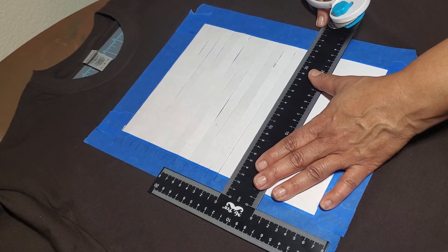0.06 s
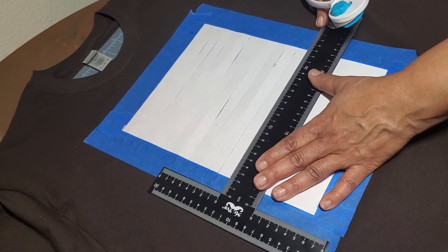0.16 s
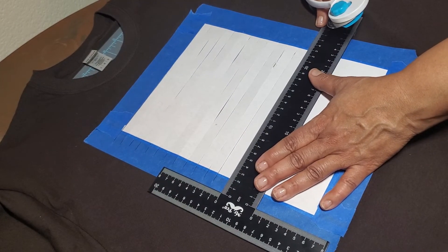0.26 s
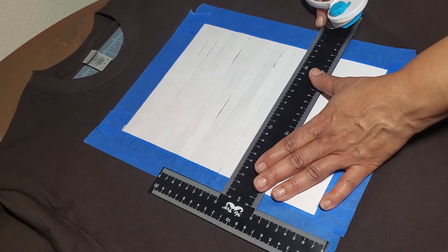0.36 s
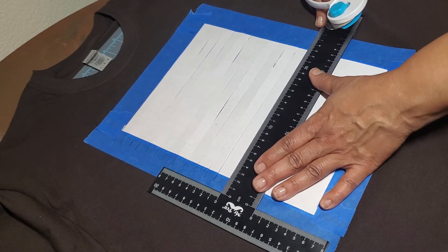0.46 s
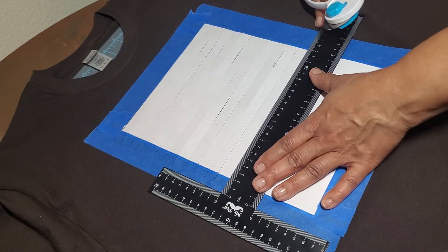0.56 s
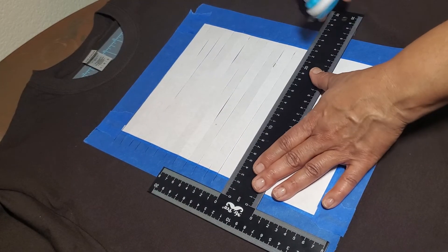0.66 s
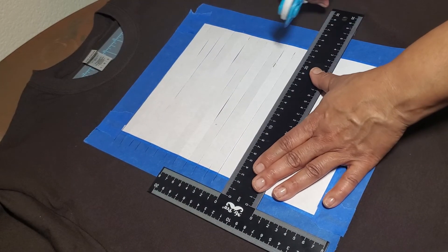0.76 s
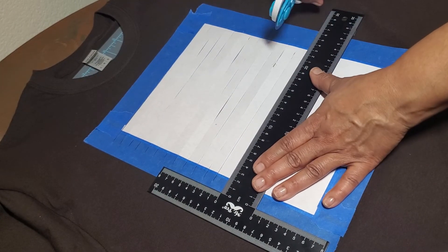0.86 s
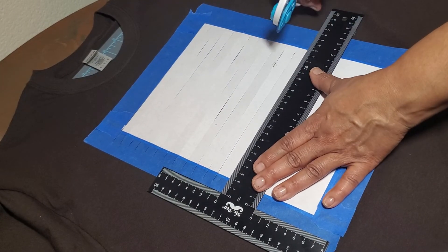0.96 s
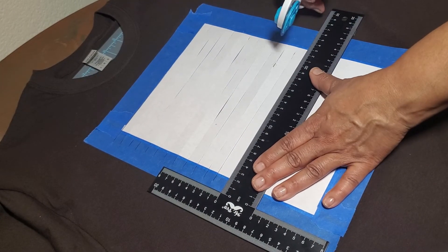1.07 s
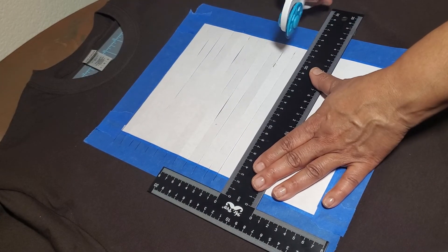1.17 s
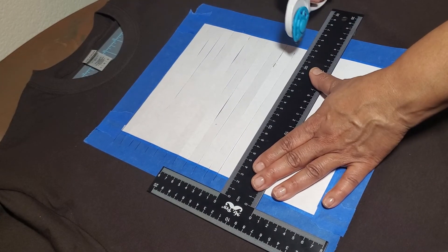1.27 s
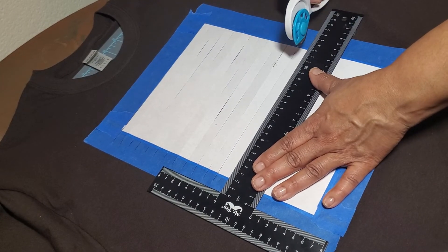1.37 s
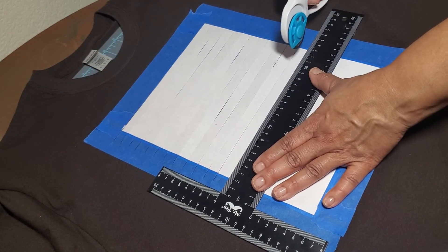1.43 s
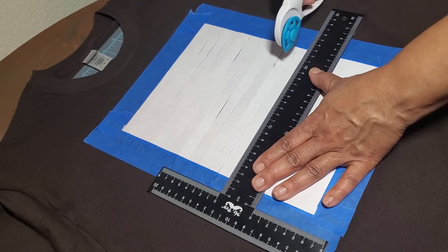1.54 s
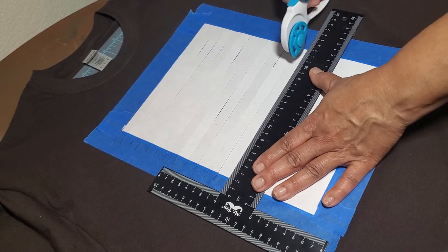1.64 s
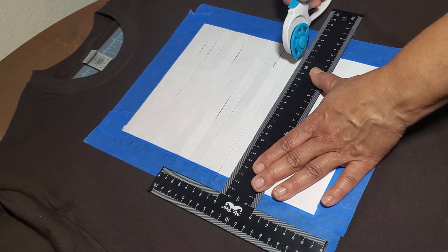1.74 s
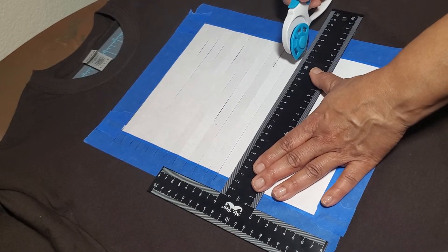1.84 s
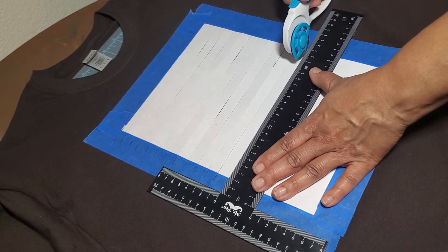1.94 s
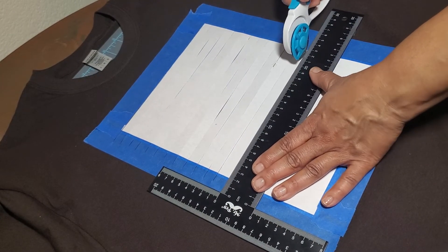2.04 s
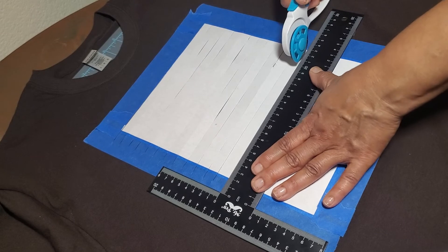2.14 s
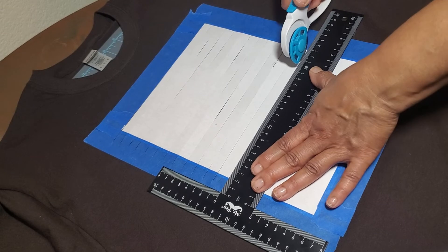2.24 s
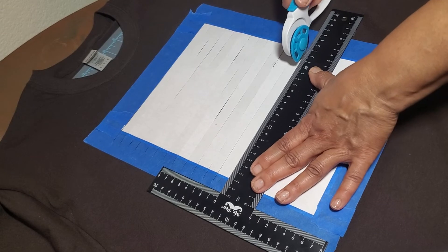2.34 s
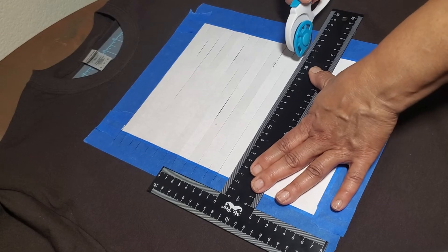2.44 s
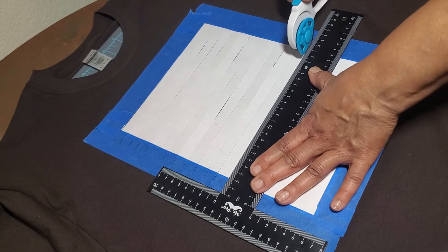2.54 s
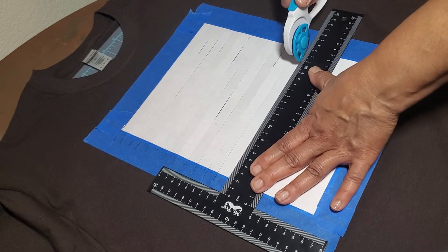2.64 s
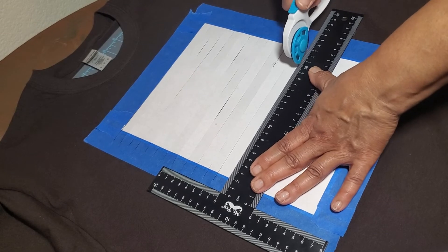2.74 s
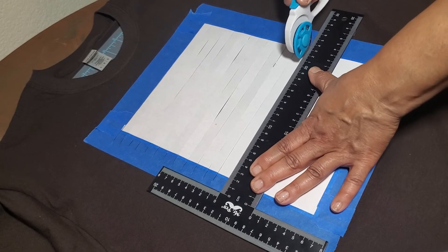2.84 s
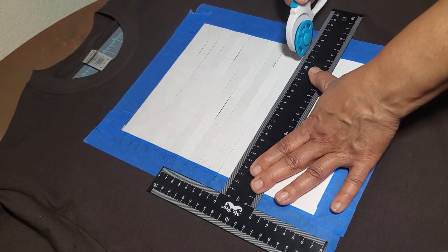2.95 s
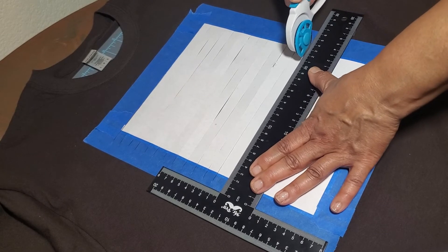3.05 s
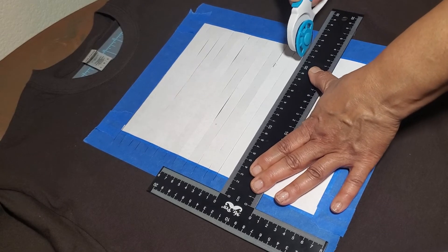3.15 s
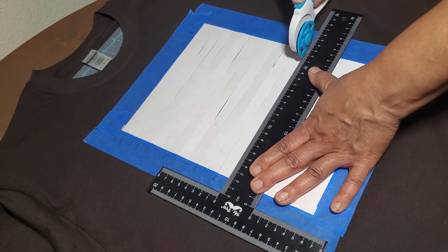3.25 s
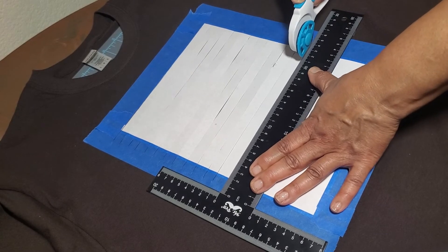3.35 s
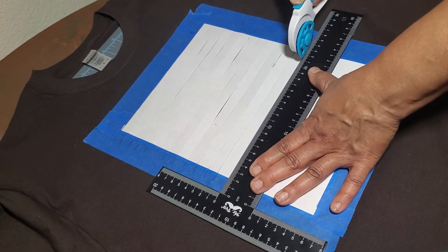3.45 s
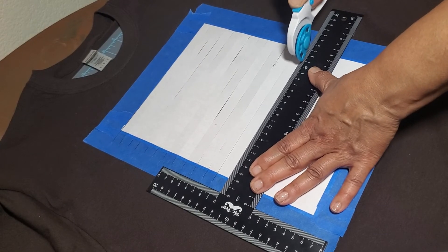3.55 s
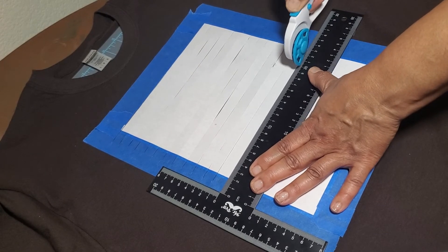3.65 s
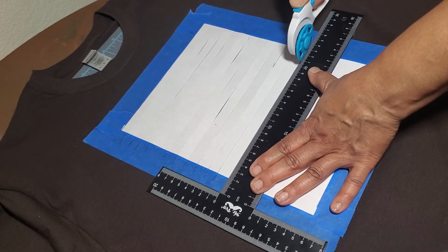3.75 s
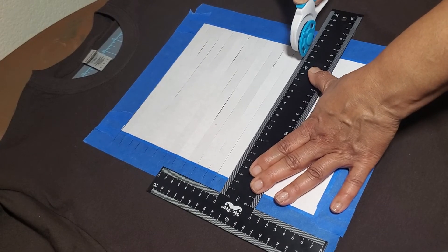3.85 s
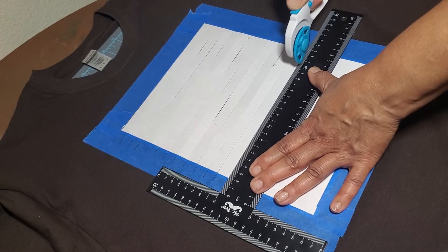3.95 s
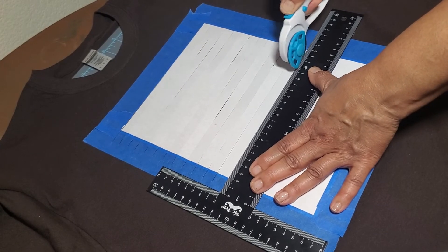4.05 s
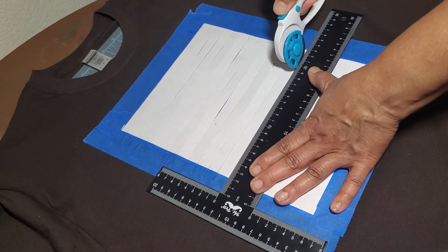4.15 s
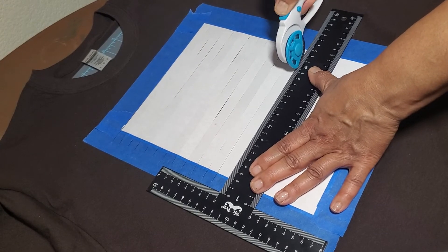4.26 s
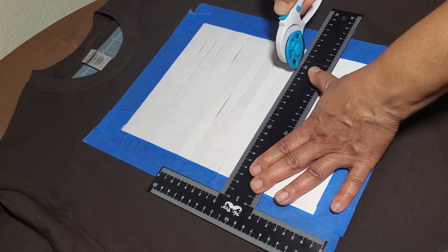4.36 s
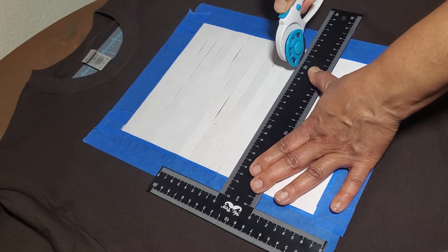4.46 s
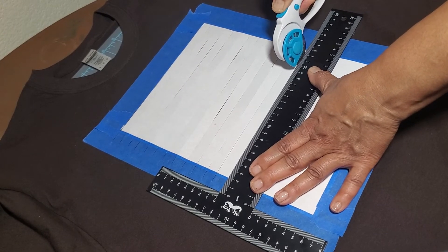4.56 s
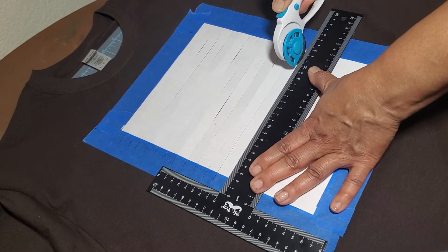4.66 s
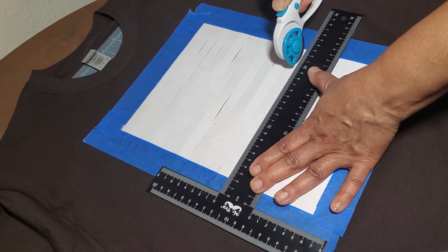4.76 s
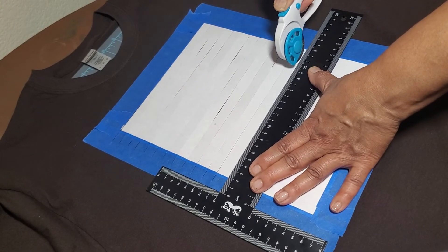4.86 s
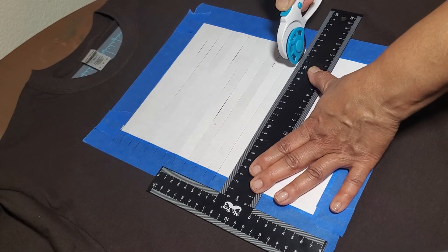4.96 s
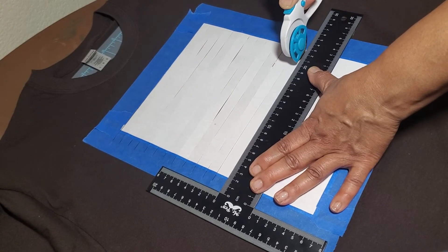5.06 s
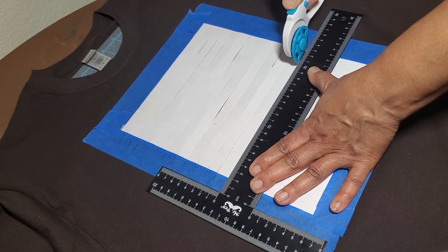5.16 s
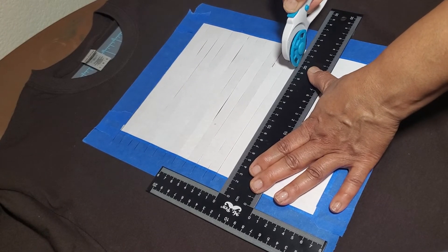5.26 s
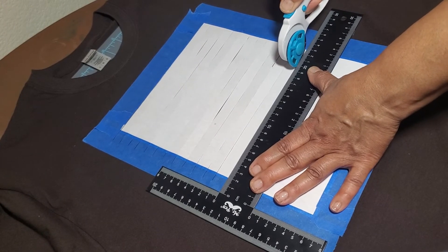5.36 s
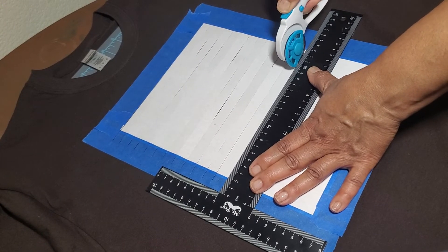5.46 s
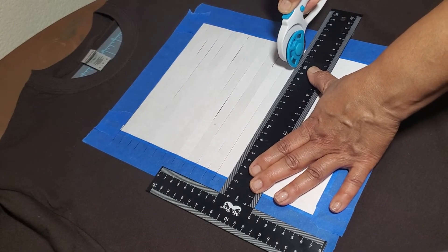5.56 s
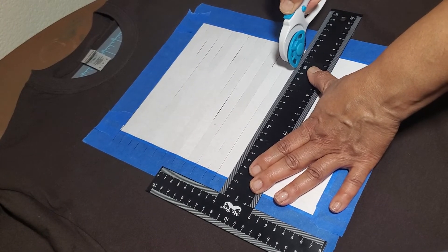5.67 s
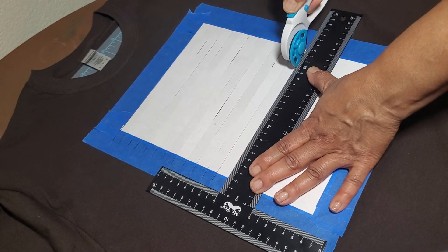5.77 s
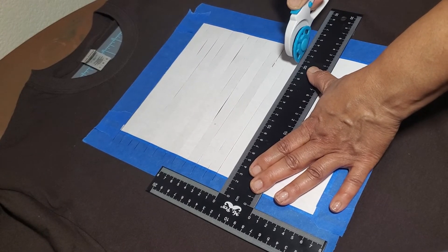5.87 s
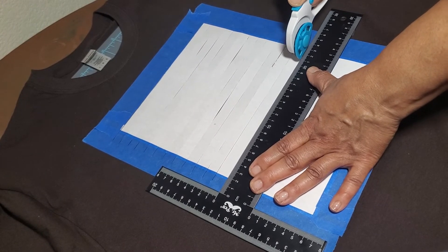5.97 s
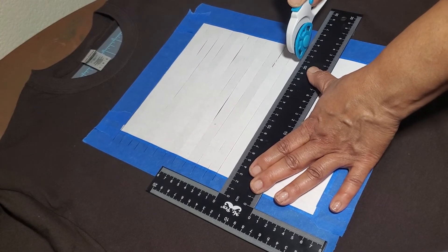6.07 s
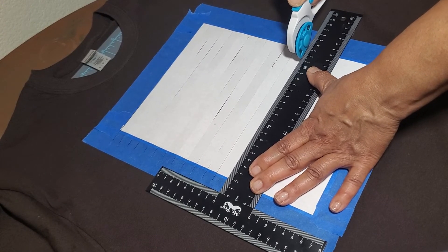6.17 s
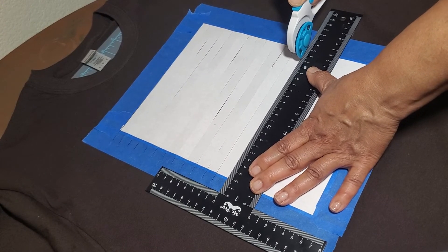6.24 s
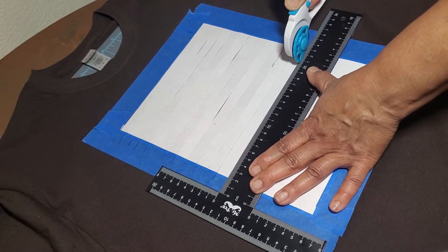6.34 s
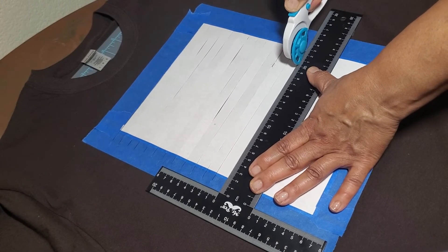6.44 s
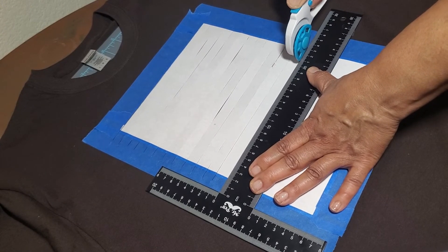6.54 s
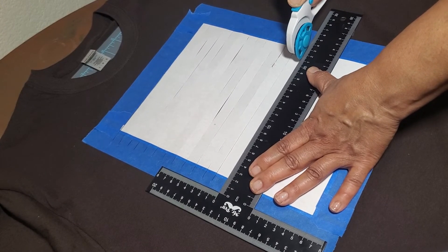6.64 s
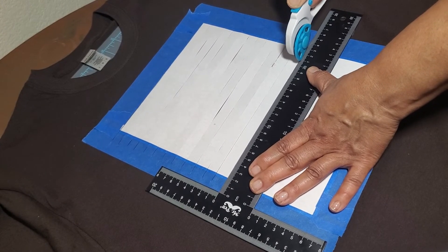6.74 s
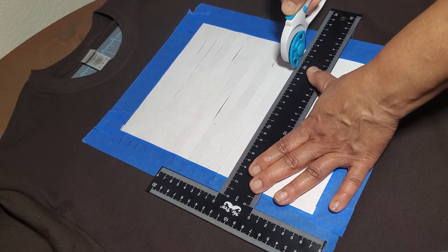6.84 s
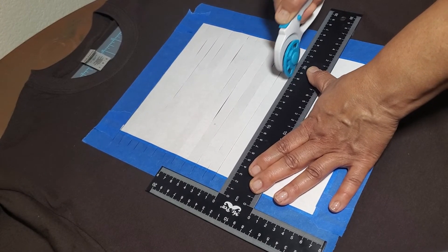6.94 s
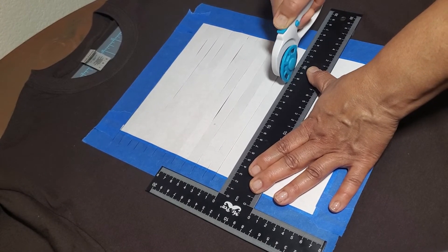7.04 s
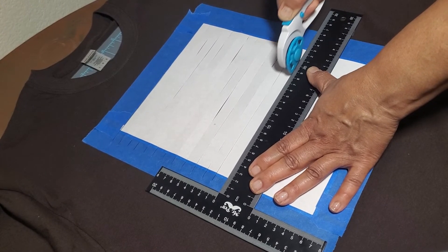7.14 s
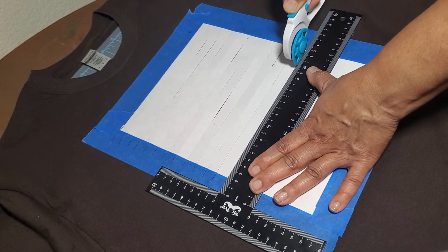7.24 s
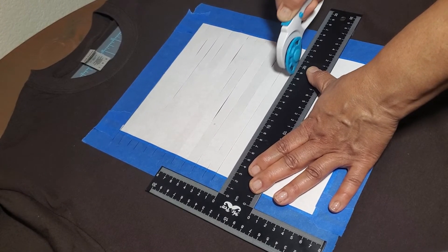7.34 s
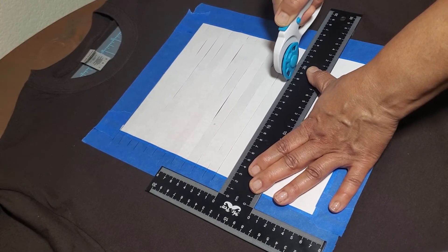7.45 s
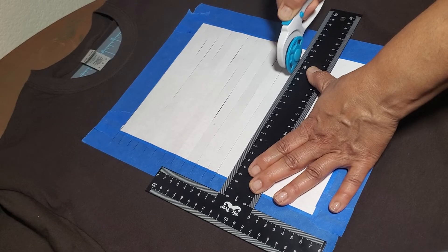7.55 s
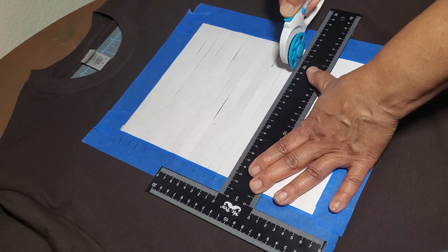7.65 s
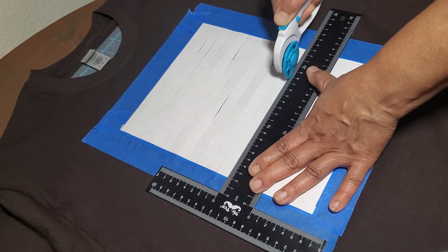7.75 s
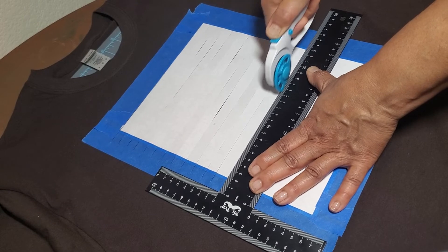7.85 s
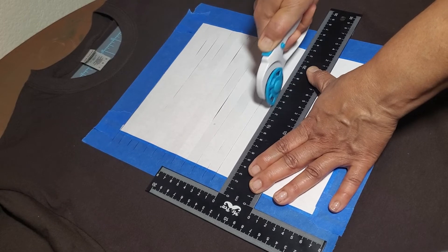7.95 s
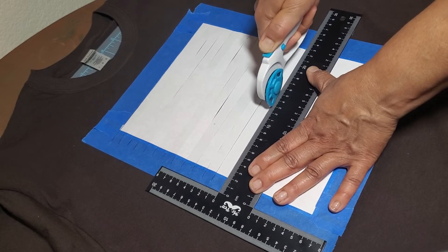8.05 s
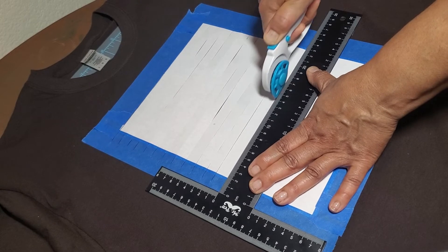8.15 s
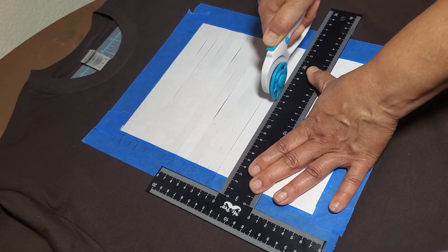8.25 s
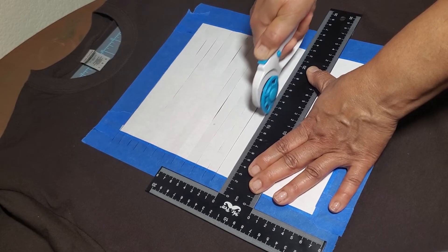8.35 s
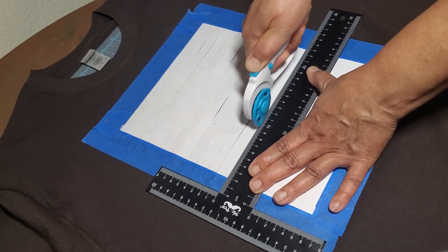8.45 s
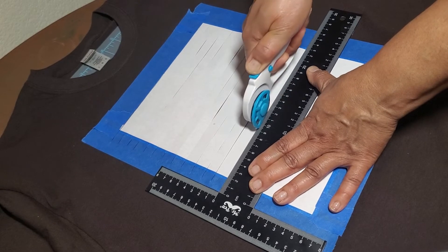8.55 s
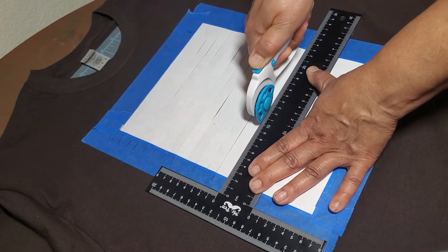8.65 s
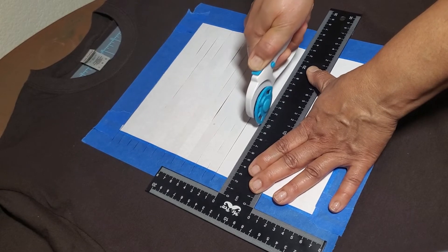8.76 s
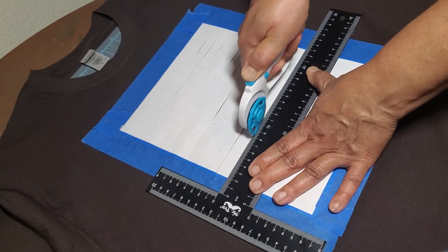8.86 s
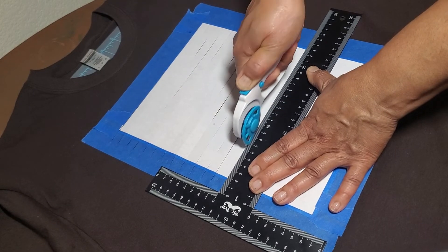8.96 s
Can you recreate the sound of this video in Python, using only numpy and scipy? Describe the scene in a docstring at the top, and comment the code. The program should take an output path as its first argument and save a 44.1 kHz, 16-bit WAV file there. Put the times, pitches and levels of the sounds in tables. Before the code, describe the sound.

A quiet indoor worktable over a low drone. For several seconds there are only hollow little knocks, a few handle clicks and padded bumps. Then a brief dry paper cut is heard, followed by another that swells, and three brighter crunchy slices close together, mixed with loud plastic clicks and knocking. The microphone is near, with a short room response.

```python
"""A rotary cutter is pushed through paper in five short strokes: random snaps make the fibres rasp.
Before and between the strokes something loose knocks dully, alone or in quick runs of hollow ringing modes.
The plastic handle clicks with short noisy cracks, bumps ring the cloth-covered table, and bands of noise
make light brushes. A small room of fading noise answers, over a low machine hum, rumble and faint hiss."""
import sys
import numpy as np
from scipy import signal
from scipy.fft import rfft, irfft, next_fast_len
from scipy.io import wavfile
from scipy.ndimage import uniform_filter1d

SR = 44100
rng = np.random.default_rng(int(sys.argv[2]) if len(sys.argv) > 2 else 0)


def wav_out(sig):
    """Save sig, one row per channel (or a flat mono array), as 16-bit PCM at SR to the path in sys.argv[1]."""
    wavfile.write(sys.argv[1], SR, np.round(np.clip(np.atleast_2d(sig).T, -1, 1) * 32767).astype(np.int16))


N = 397076
TIME = np.arange(N) / SR  # s
RING = TIME[:SR // 2]  # s, the time axis of every hit and room response


def undb(db):
    """Turn decibels into a gain."""
    return 10 ** (np.asarray(db) / 20)


def unit(x):
    """Scale a sound to rms 1."""
    return x / np.sqrt(np.mean(x ** 2))


def unit_energy(x):
    """Scale a response so that it passes noise at the same power."""
    return x / np.sqrt(np.mean(np.sum(x ** 2, axis=-1)))


def shape(x, gain):
    """Filter by a gain that is a function of frequency."""
    size = 2 * next_fast_len(x.shape[-1])
    f = np.linspace(1, SR / 2, size // 2 + 1)
    return irfft(rfft(x, size) * gain(f))[..., :x.shape[-1]]


def colour(x, points):
    """Filter through (f/Hz, level/dB) points, with no sound ahead of its cause."""
    hz, db = np.transpose(points)

    def gain(f):
        """Folding the cepstrum forward in time gives the minimum-phase filter."""
        level_db = np.interp(np.log(f), np.log(hz), db)
        cepstrum = irfft(np.log(undb(level_db)))
        cepstrum[1:len(f) - 1] *= 2
        cepstrum[len(f):] = 0
        return np.exp(rfft(cepstrum))
    return shape(x, gain)


def bell(f, hz, octaves):
    """A hump on the log-frequency axis."""
    return np.exp(-.5 * (np.log2(f / hz) / octaves) ** 2)


def walk(rate):
    """Smooth random wandering with rms 1; rate is the number of fresh values a second."""
    k = int(SR / rate)
    steps = np.repeat(rng.standard_normal(N // k + 1), k)
    smooth = uniform_filter1d(uniform_filter1d(steps, k), k)
    return unit(smooth[:N])


def diffuse(size):
    """Noise from all around: the bass is alike in both channels, the treble unrelated."""
    alike_hz = 684
    mid, side = rng.standard_normal((2, size))
    alike = lambda f: 1 / (1 + (f / alike_hz) ** 1.26)
    mid = shape(mid, lambda f: np.sqrt(1 + alike(f)))
    side = shape(side, lambda f: np.sqrt(1 - alike(f)))
    return unit(np.array([mid + side, mid - side]))


def fade(t60):
    """Exponential decay that falls by 60 dB in t60 seconds."""
    return np.exp(-np.log(1000) * RING / t60)


def ring(modes):
    """Stereo sum of fading (f/Hz, level/dB, t60/s) tones; higher ones differ more in phase between channels."""
    out = 0
    for hz, db, t60 in modes:
        phase = rng.random() + rng.standard_normal((2, 1)) * hz / 6000  # in turns
        out = out + undb(db) * fade(t60) * np.sin(2 * np.pi * (hz * RING + phase))
    return unit_energy(out)


def add(out, s, db, hit):
    """Place a hit at s seconds so that its loudest 3 ms reach the given level."""
    power = np.atleast_2d(hit).mean(axis=0) ** 2
    peak = np.sqrt(uniform_filter1d(power, size=132).max())
    i = int(s * SR)
    out[..., i:i + len(RING)] += (hit * undb(db) / peak)[..., :N - i]


def room(early_db, late_db, early_t60):
    """Direct sound, reflections off table and arms, then the walls, built up gradually from noise."""
    wall_t60 = 0.33  # s
    response = undb(early_db) * unit_energy(diffuse(len(RING)) * fade(early_t60))
    walls = diffuse(len(RING)) * fade(wall_t60) * (1 - fade(.06))
    response += undb(late_db) * unit_energy(walls)
    response[[0, 1], [4, 0]] += 1  # direct sound, four samples later on the left
    return unit_energy(response)


def through(x, response):
    """Pass a sound through a stereo response."""
    return signal.fftconvolve(np.atleast_2d(x), response, axes=1)[:, :x.shape[-1]]


def pan(db):
    """Gains that make the left channel this many dB louder than the right."""
    return undb(np.array([[db], [-db]]) / 2)


def hum():
    """A machine drones on two wavering tones a fifth apart, with a mains tone, rumble and hiss."""
    # lowest tone, before its random wavering: t/s, level/dB
    drone_curve = [(0.0, -55), (1.08, -57.5), (4.33, -53.5), (5.11, -64.5), (5.44, -47.5), (6.39, -48),
                   (6.64, -53), (8.5, -52), (8.67, -64), (9.0, -45)]
    # mains tone: t/s, level/dB
    mains_curve = [(1, -59), (1.8, -75.5), (9, -62)]
    # tone colour of the rumble: f/Hz, relative level/dB
    rumble_colour = [(20, -24), (35, -8.5), (55, -1), (72, -1.5), (83, 2), (95, -5), (108, -7),
                     (140, -10.5), (175, -21), (300, -20.5), (420, -36), (1500, -45), (4000, -55.5)]
    # tone colour of the hiss: f/Hz, relative level/dB
    hiss_colour = [(300, 0), (1000, 9), (2500, 7), (5000, 5), (5600, 13), (6800, 11.5), (7300, -25),
                   (9000, -9.5), (12000, 7.5), (16000, -27)]
    drone_hz, mains_hz = 63.7, 120.3
    drone_db, mains_db = (np.interp(TIME, *np.transpose(curve)) for curve in (drone_curve, mains_curve))
    wavering_hz = drone_hz * (1 + 0.01215 * walk(6))
    phase = 2 * np.pi * np.cumsum(wavering_hz) / SR
    drone = undb(drone_db + 1.8 * walk(9)) * unit(np.sin(phase))
    drone += undb(-60 + 3.3 * walk(3.1)) * unit(np.sin(3 * phase / 2))  # the third order of the shaft
    mains = undb(mains_db) * unit(np.sin(2 * np.pi * mains_hz * TIME))
    rumble = undb(-55.0 + 0.9 * walk(4.7)) * unit(colour(diffuse(N), rumble_colour))
    hiss = undb(-81) * unit(colour(diffuse(N), hiss_colour))
    return (drone + mains + rumble + hiss) * pan(1.0)


def knock_contacts():
    """Every knock as (t/s, level/dB, brightness/dB): within a run they are evenly spaced and grow."""
    # single knocks and runs: t/s of the first, time to the last/s,
    # relative peak level of the first/dB, relative brightness/dB
    runs = [(.298, 0, -61, -32), (.985, .105, -59, -42), (2.189, .24, -55, -28), (2.542, .336, -42.5, -11),
            (2.995, 0, -50.5, -21.5), (3.138, .106, -48.5, -20), (3.543, 0, -52, -4.5), (3.725, 0, -50, -9),
            (3.794, .111, -48, -13), (4.04, .102, -49, -17), (4.376, .099, -52, -21), (5.226, 0, -54, -27),
            (5.756, 0, -48, -9), (5.995, 0, -52.5, -13), (6.151, 0, -53, -10), (6.327, 0, -50.5, -4.5),
            (6.472, .106, -42, -15), (6.706, 0, -44, -21), (7.068, .117, -42, -9.5), (7.31, .23, -48, -2),
            (7.718, 0, -50, -3), (8.091, 0, -44.5, -8.5), (8.196, 0, -51, -31), (8.577, .11, -47.5, -11)]
    usual_gap, growth_db = .11, 1.5  # s between knocks; each is a little harder than the one before
    for start, length, db, upper_db in runs:
        count = 1 + round(length / usual_gap)
        for k, s in enumerate(np.linspace(start, start + length, count)):
            yield s, db + k * growth_db, upper_db


def knocks():
    """Something loose knocks: each knock adds freshly drawn scattered noise to the same hollow ring."""
    # tones of the hollow ring: f/Hz, relative level/dB, t60/s
    hollow_modes = [(190, -6, 0.38), (316.2, -0.5, 0.39), (297.3, 5.5, 0.11), (372, -2.5, 0.3),
                    (431.5, -30, 0.23), (513, -11, 0.21), (798, -8, 0.52), (967, -24, 0.13),
                    (1230, -16, 0.17), (1430, -8, 0.52)]
    # tone colour of the scattered noise: f/Hz, relative level/dB
    scatter_colour = [(120, -16), (300, 3.5), (480, 4.5), (800, -0.5), (1450, -7), (1750, -26.5),
                      (4000, -30)]
    out = np.zeros((2, N))
    hollow = ring(hollow_modes)
    soft_contact = 1 - fade(.015)  # a gentle onset
    for s, db, upper_db in knock_contacts():
        scatter = diffuse(len(RING)) * fade(0.41)
        response = hollow + undb(-1.5) * unit_energy(colour(scatter, scatter_colour))
        bright_db = 0.86 * (upper_db + 8.0)
        tone = [(450, 0.0062), (1000, bright_db - 1.5), (1500, bright_db), (2500, bright_db + 0.5)]
        add(out, s, db, colour(response * soft_contact, tone))
    return undb(-2.0) * out


def brushes():
    """Skin and plastic slide lightly over paper and ruler: bands of noise that swell and fade."""
    # strokes of hand and cutter: t/s of the middle, length/s (spread of the bell-shaped swell),
    # level/dB before it flickers, centre f/Hz, width/octaves
    touches = [(1.544, .013, -63, 4330, 0.38), (2.696, 0.011, -59.5, 3900, 0.56),
               (2.782, .098, -67, 3400, 0.69), (3.352, 0.027, -79, 2700, 0.28),
               (4.113, 0.0097, -66.5, 5150, 0.21), (4.345, 0.029, -64.5, 3900, 0.72),
               (4.681, .01, -71, 2620, .55), (4.892, .018, -63, 2920, 0.55),
               (6.366, 0.029, -67, 3440, 0.88), (7.764, .017, -55, 5920, 0.76)]
    out = np.zeros(N)
    for s, length, db, hz, octaves in touches:
        grain = unit(shape(rng.standard_normal(N), lambda f: bell(f, hz, octaves)))
        out += undb(db) * grain * np.exp(-.5 * ((TIME - s) / length) ** 2)
    flicker = undb(2 * walk(90))
    return through(out * flicker, room(early_db=-2, late_db=-6, early_t60=.03)) * pan(3)


def clicks():
    """The blade shifts in its plastic handle: a brief noisy scrunch and a short ring."""
    # clicks of handle and blade: t/s, relative peak level/dB, relative top level/dB
    contacts = [(1.7479, -44, -27), (1.767, -45.5, -35), (2.129, -63, -9), (2.309, -54, -2.5),
                (4.789, -52.5, -26), (4.8399, -42, -15.5), (6.3258, -59, -8), (6.4999, -50.5, 2.5),
                (7.089, -34, -4.5), (7.1278, -41, -3), (7.1679, -37, -4.5), (7.196, -37.5, -6.5),
                (7.374, -46.5, -3.5), (7.41, -47, -2.5), (7.5577, -49, -13), (7.803, -36, -1),
                (7.907, -32, -5), (8.126, -55, -4), (8.1564, -52.5, -4.5), (8.2726, -53, -9),
                (8.9468, -33.5, -5)]
    # ringing of the handle: f/Hz before the random shift, relative level/dB, t60/s
    handle_modes = [(1370, -32, .12), (2234, 4, 0.12), (3150, -10.5, 0.16), (3470, -4.5, 0.13),
                    (4290, -5, 0.067), (5070, -1.5, 0.12), (7030, -2, 0.059)]
    out = np.zeros((2, N))
    space = room(early_db=-4, late_db=-4.5, early_t60=.06)
    for s, db, top_db in contacts:
        low_db = -17.5 - 0.68 * top_db  # a softer contact trades top for low body
        # the pitches vary slightly at random from click to click
        varied = [(hz * (1 + .012 * rng.standard_normal()), mode_db, t60) for hz, mode_db, t60 in handle_modes]
        handle = ring(varied)
        crack = unit_energy(diffuse(len(RING)) * np.exp(-(RING / .0075) ** 2))
        crack += undb(-11.5) * handle
        tone = [(200, low_db - 7.0), (900, low_db + 12.5), (2200, low_db + 0.5), (3300, 0.087),
                (6500, -3.2), (9000, top_db + 0.5), (15000, top_db)]
        add(out, s, db, through(colour(crack, tone), space))
    return undb(-5.0) * out * pan(2.6)


def bumps():
    """Cutter and hand bump the padded table; each contact favours its own range of modes."""
    # bumps: t/s, peak level/dB, favoured f/Hz
    contacts = [(1.754, -43, 155), (1.754, -48, 330), (2.770, -32.5, 488), (4.792, -38, 262),
                (4.795, -45.5, 150), (5.844, -37, 368)]
    # ringing of the table: f/Hz, relative level/dB before each bump favours its range, t60/s
    table_modes = [(140.6, -1, 0.14), (264, 1.5, 0.16), (322, 6, 0.12), (405.2, 3, 0.27), (486, 4.5, 0.07),
                   (603, -9, 0.16), (732, -7.5, 0.42)]
    out = np.zeros((2, N))
    space = room(early_db=-3.0, late_db=12.0, early_t60=0.048)
    for s, db, hz in contacts:
        # modes lose 22 dB for each octave away from the favoured pitch
        modes = [(f, mode_db - 22 * abs(np.log2(f / hz)), t60) for f, mode_db, t60 in table_modes]
        tone = [(hz / 2, -24), (hz, 0), (hz * 2.46, -22), (hz * 9, -46)]
        thud = unit_energy(colour(space, tone))
        soft_contact = 1 - fade(0.0088)
        add(out, s, db, ring(modes) * soft_contact + undb(-9.5) * thud)
    return out


def snaps(rate, spread_db):
    """Random tiny fractures, rate of them a second on average, some a few dB larger than the rest."""
    size = undb(spread_db * np.minimum(rng.exponential(size=N), 4))
    happens = rng.random(N) < rate / SR
    return unit(happens * size * rng.standard_normal(N))


def push():
    """Gains of crunch and treble: a stroke scrapes, bites in, swells or eases under the hand, dulls and dies away."""
    # cutting strokes: start t/s, bite/s, length of the push/s, relative crunch level at mid-push/dB,
    # swell over the push/dB (negative: it eases), treble against crunch at mid-push/dB
    strokes = [(5.822, 0.047, 0.096, -50.5, -1, -4.5), (6.789, 0.03, 0.17, -47.5, 16, -2.5),
               (7.795, 0.034, 0.17, -45, 4, 1), (8.327, 0.025, 0.16, -46, -3, 1),
               (8.799, 0.045, 0.14, -48.5, 4, 1.7)]
    lead, lead_db = 0.081, -22.5  # s, dB: the wheel scrapes lightly before it bites
    stop_rate = 328  # dB/s: the wheel comes to rest
    dulling, stop_dulling = 39, 85  # dB/s: the treble sinks, and faster as the wheel stops
    crunch, treble = np.zeros((2, N))
    for start, bite, length, db, swell_db, treble_db in strokes:
        age = np.clip(TIME - start, 0, 1)
        stopping = np.maximum(age - length, 0)  # s since the end of the push
        scrape = undb(lead_db) * np.clip(1 + (TIME - start) / lead, 0, 1)
        depth = np.minimum(scrape + age / bite, 1)
        progress = np.minimum(age / length, 1)
        gain = depth * undb(db + swell_db * (progress - .5) - stop_rate * stopping)
        crunch += gain
        treble += gain * undb(treble_db - dulling * (age - length / 2) - stop_dulling * stopping)
    return crunch, treble


def cutting():
    """The blade crushes fibres in a dense crackle that rings the sheet, while the wheel rumbles on the table."""
    # tone colour of the snapping fibres: f/Hz, relative level/dB
    crunch_colour = [(380, -34), (650, -8), (795, 0), (1070, 0.5), (1170, 1.5), (2170, -4.5), (2620, -5),
                     (3920, -9.5), (6790, -20.5), (7970, -23), (15000, -18), (16000, -35)]
    # tone colour of the rolling wheel: f/Hz, relative level/dB
    roll_colour = [(90, -9), (160, -13), (240, -10.5), (330, -1.5), (480, -5), (640, -12.5), (1000, -35.5)]
    # ringing of the pressed cutter and sheet: f/Hz, relative level/dB, t60/s
    sheet_modes = [(774, 3.5, 0.14), (1060, 1.5, 0.03), (1318, -0.5, 0.17), (1628, -1.5, 0.05),
                   (2735, 2, 0.2)]
    crunch, treble = push()
    # independent random snaps in each channel make the rasp sound wide
    fibres = np.array([snaps(rate=4500, spread_db=1.0) for _ in range(2)])
    fibres = fibres * undb(1.0 * walk(90))
    rasp = colour(fibres + undb(-15) * through(fibres, ring(sheet_modes)), crunch_colour)
    # split near 4500 Hz so that the treble can follow its own gain
    low = shape(rasp, lambda f: 1 / (1 + (f / 4500) ** 6))
    dry = undb(3.5) * unit(low) * crunch * pan(0.99)
    dry = dry + undb(3.0) * unit(rasp - low) * treble * pan(2.7)
    # the wheel rumbles even under light pressure, so it swells less than the crunch
    wheel = undb(-16.5) * unit(colour(snaps(rate=1500, spread_db=2.0), roll_colour)) * crunch ** 0.62
    return through(dry + wheel, room(early_db=-3, late_db=-8.5, early_t60=0.054))


def scene():
    """Everything on and around the table."""
    return hum() + knocks() + brushes() + clicks() + bumps() + cutting()


def record(dry):
    """The recorder cuts the top with a steep low-pass filter."""
    top_hz = 15900
    steep = signal.ellip(10, .2, 80, top_hz, fs=SR, output="sos")
    return signal.sosfilt(steep, dry)


dry = scene()
out = record(dry)
wav_out(out)
```